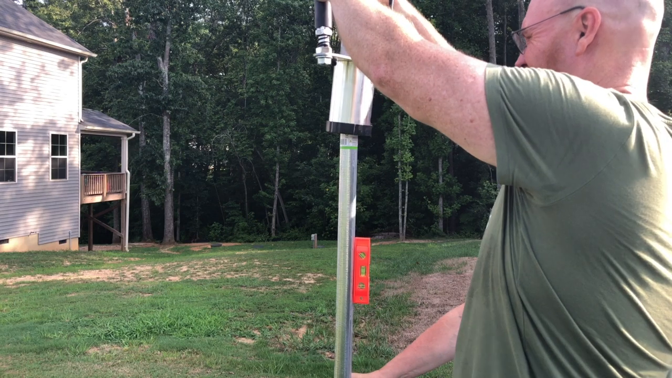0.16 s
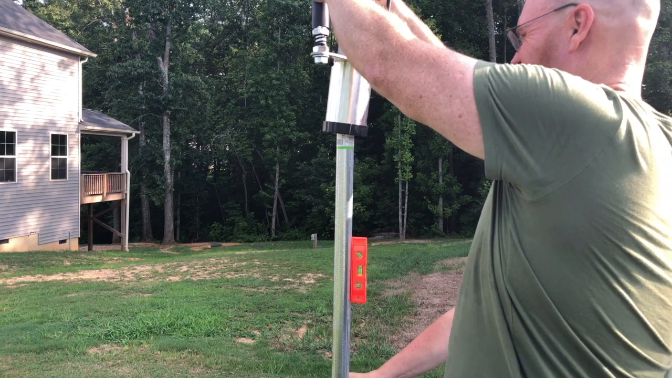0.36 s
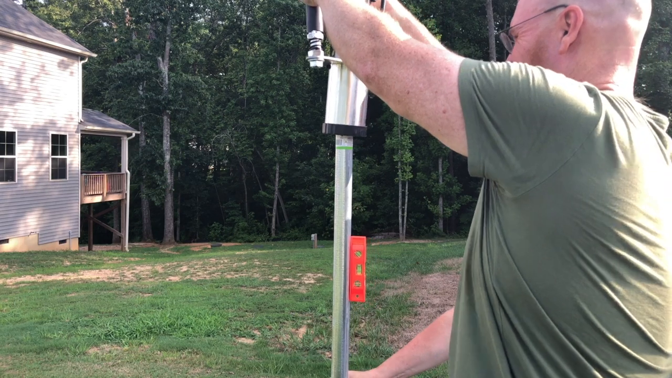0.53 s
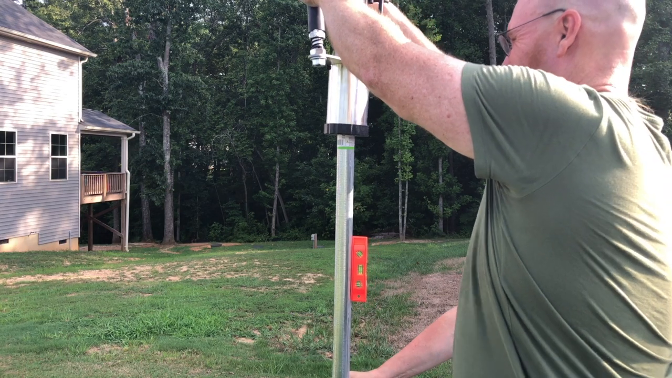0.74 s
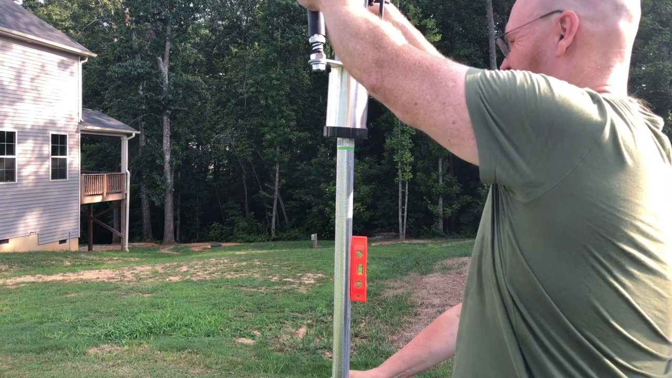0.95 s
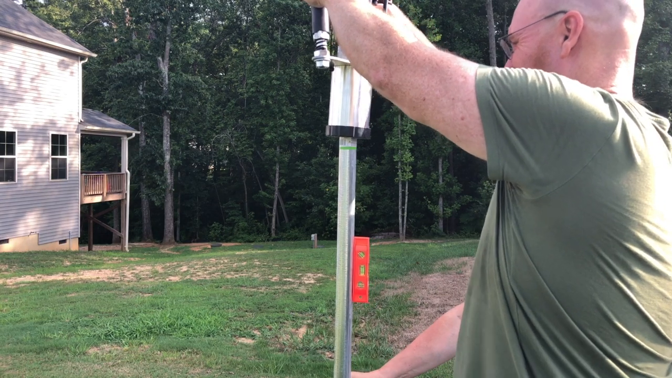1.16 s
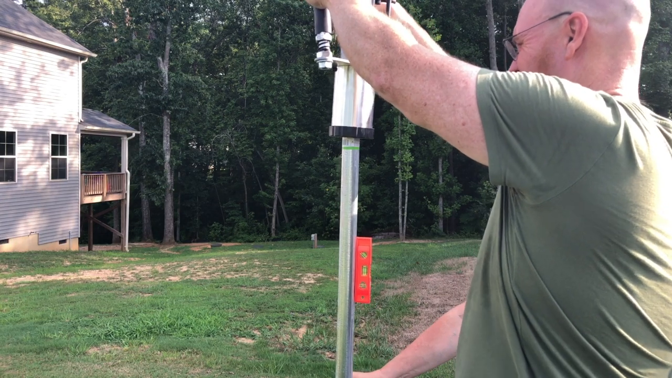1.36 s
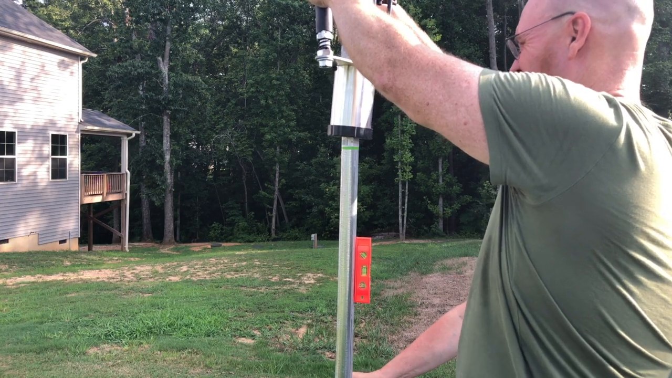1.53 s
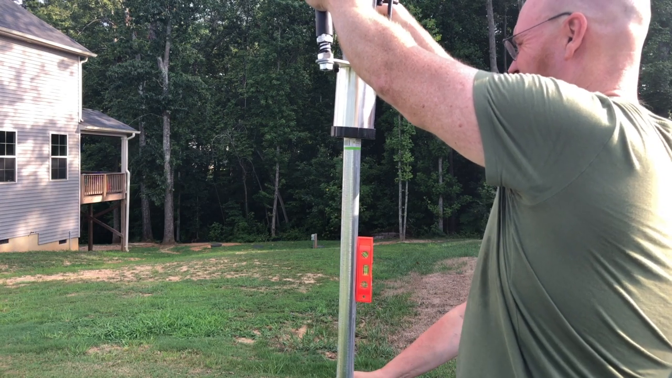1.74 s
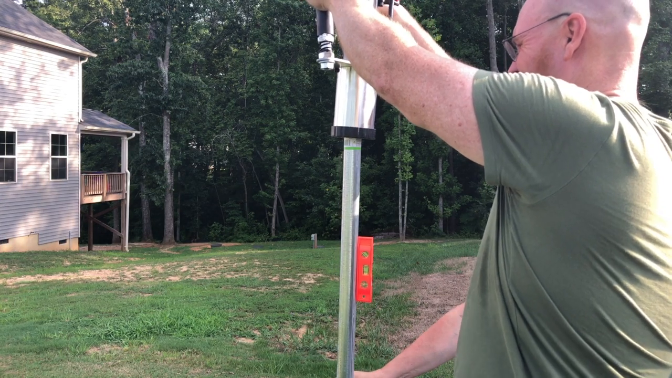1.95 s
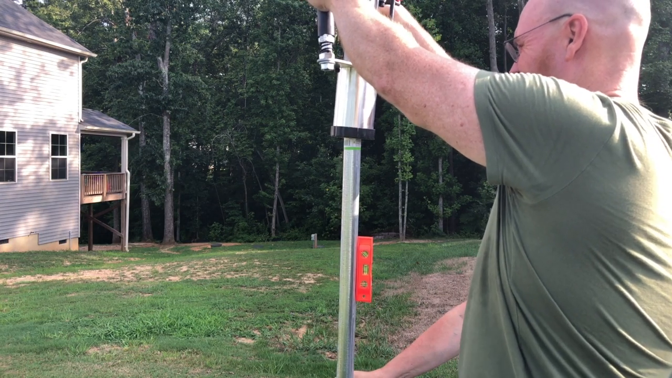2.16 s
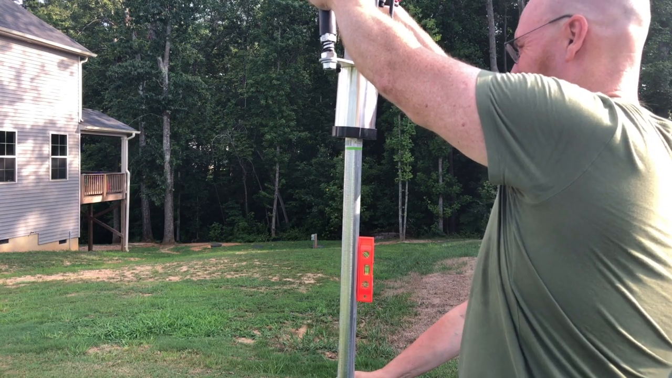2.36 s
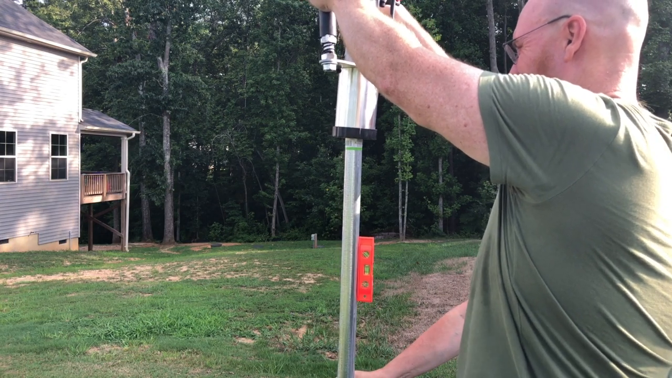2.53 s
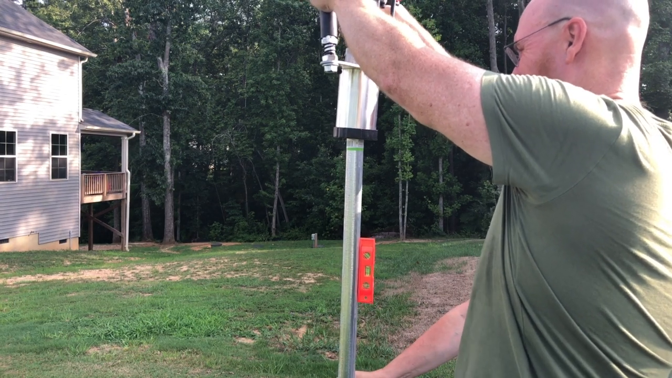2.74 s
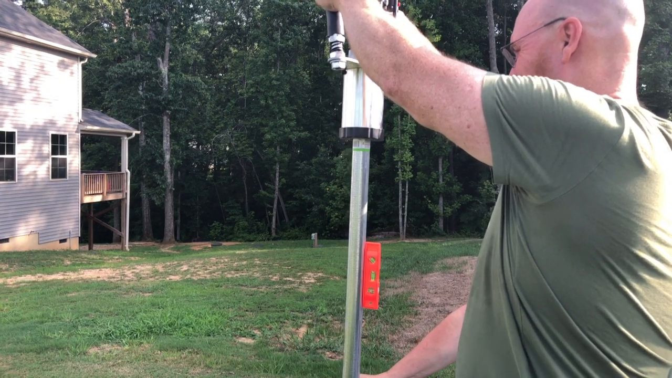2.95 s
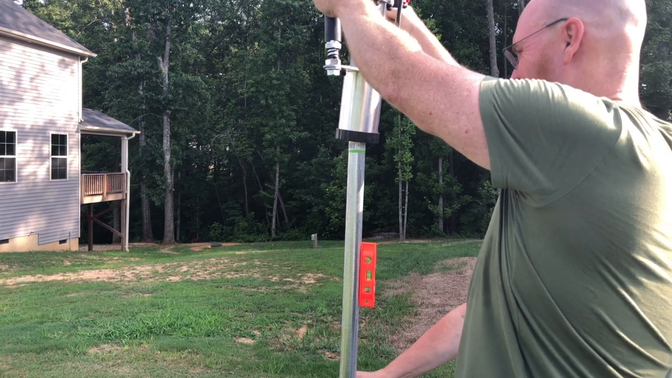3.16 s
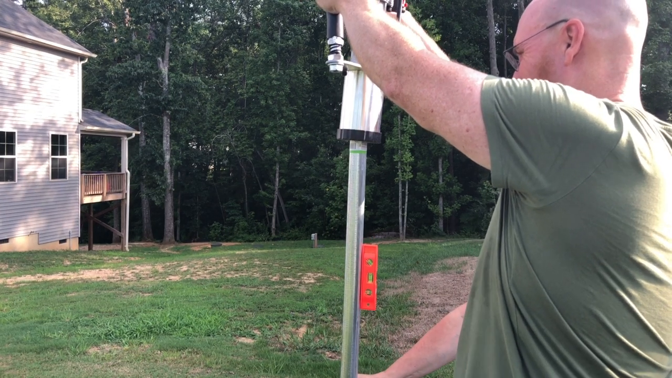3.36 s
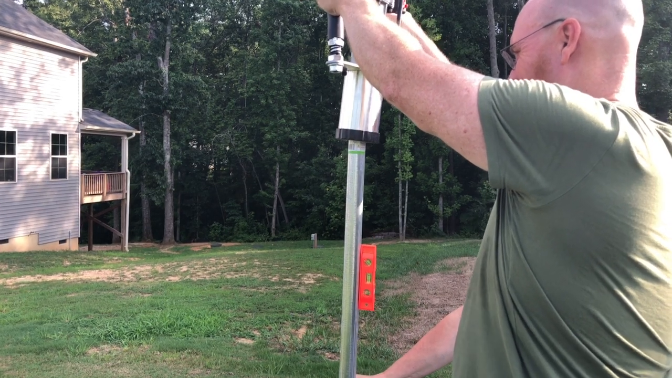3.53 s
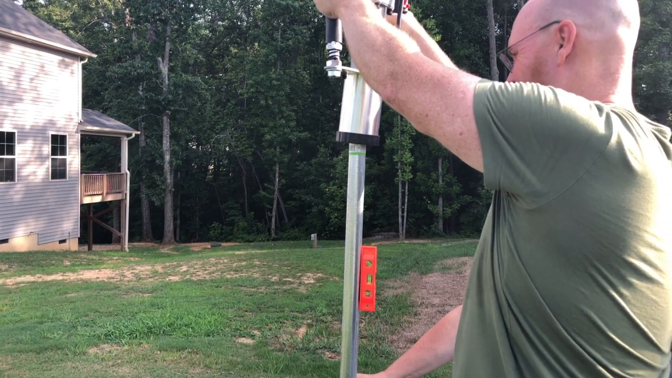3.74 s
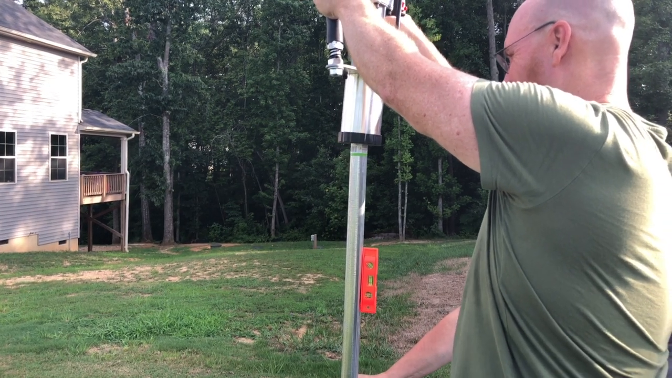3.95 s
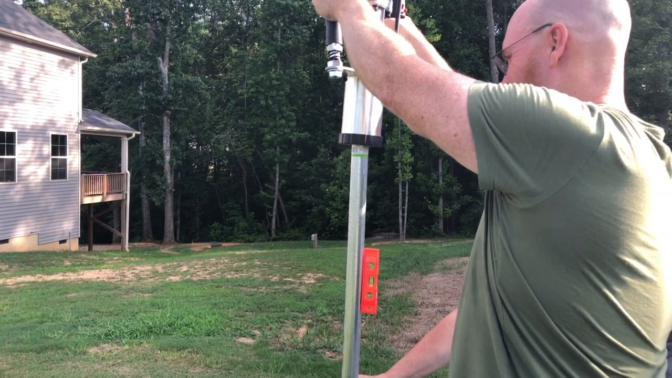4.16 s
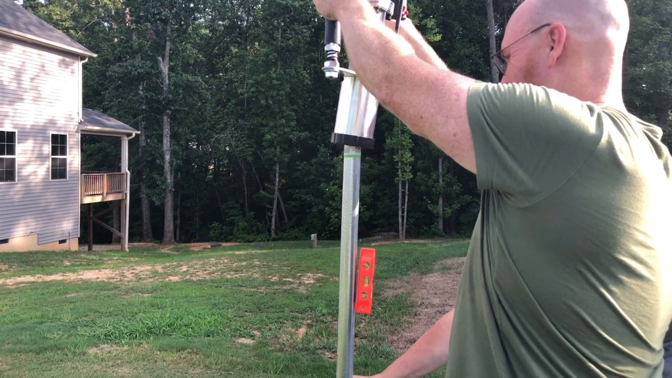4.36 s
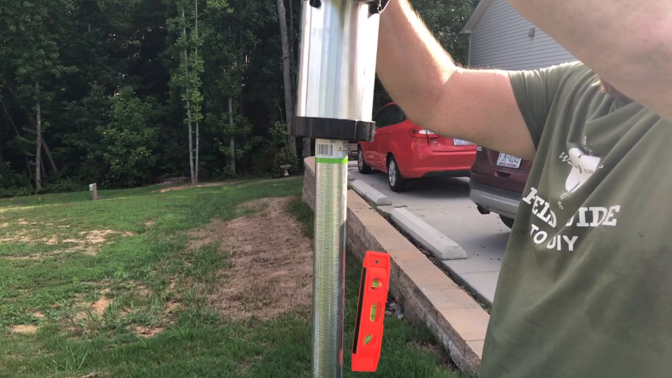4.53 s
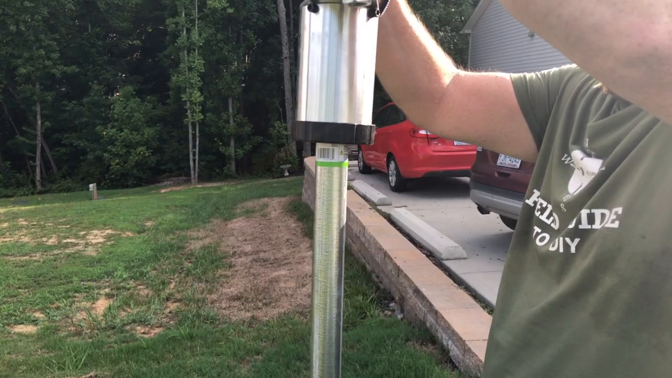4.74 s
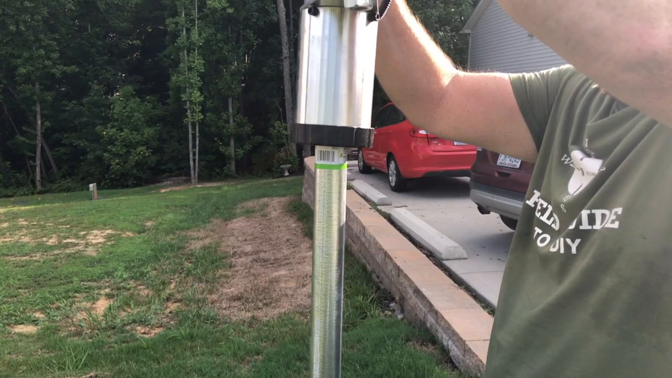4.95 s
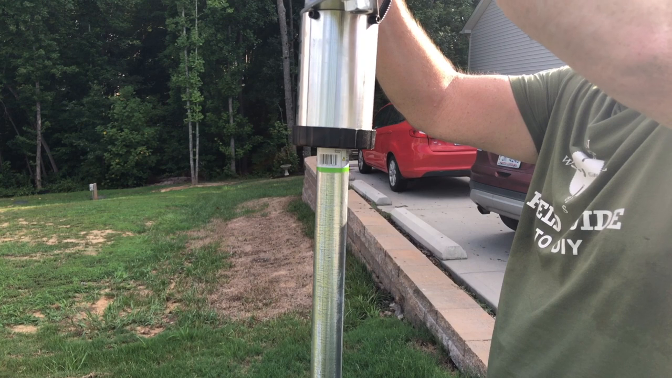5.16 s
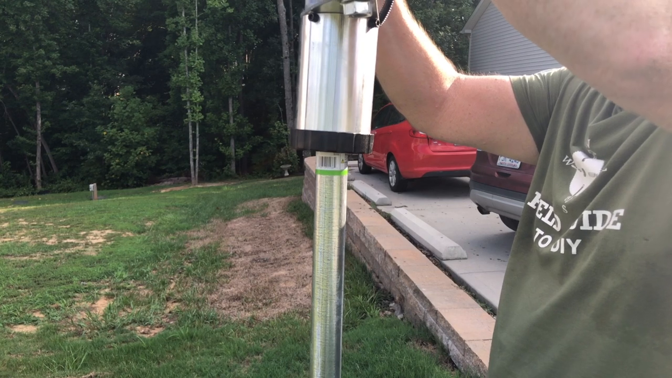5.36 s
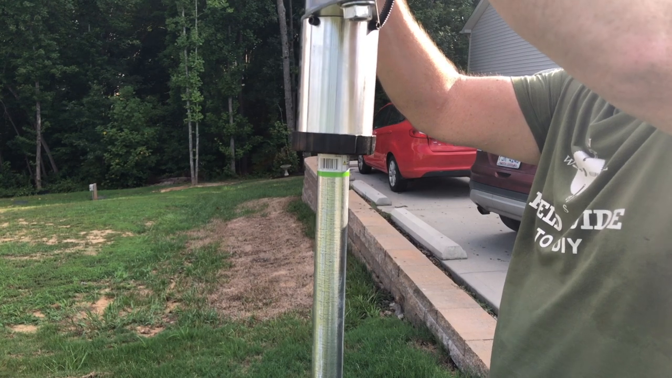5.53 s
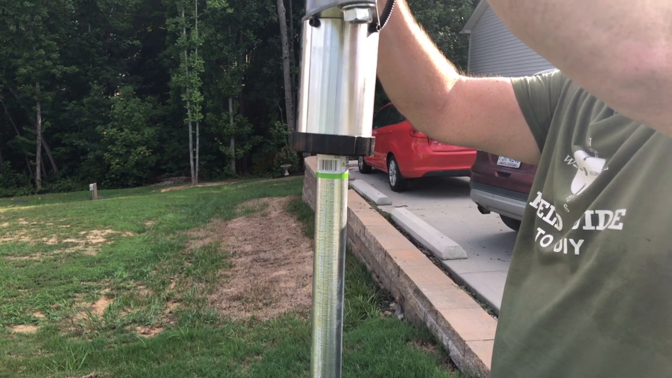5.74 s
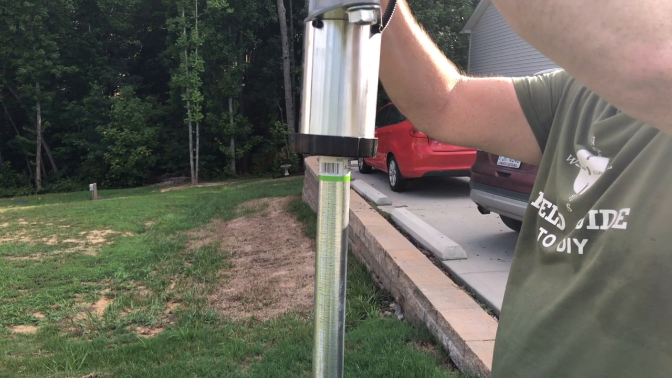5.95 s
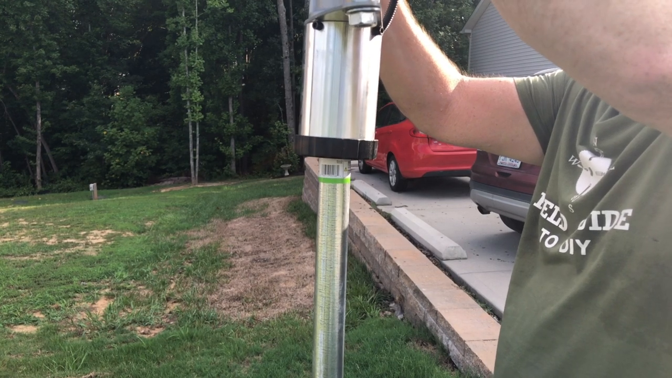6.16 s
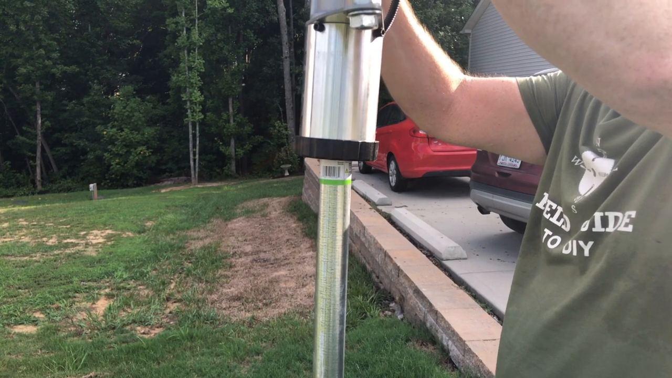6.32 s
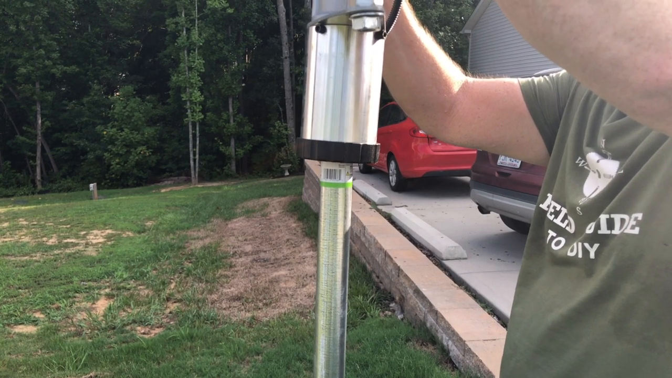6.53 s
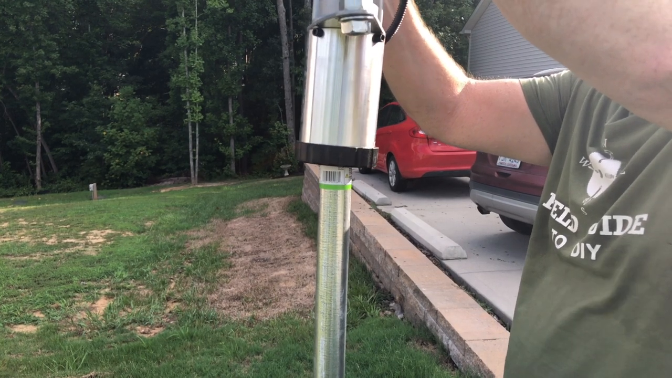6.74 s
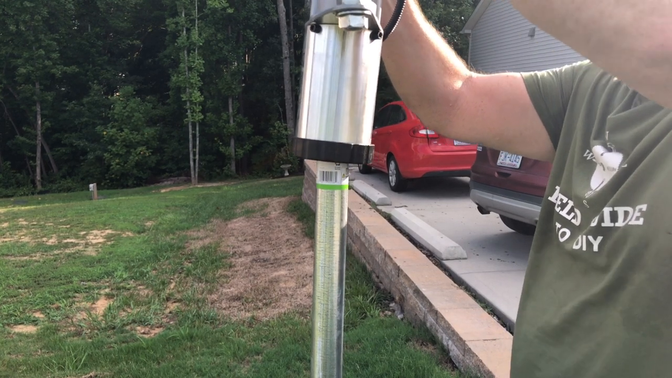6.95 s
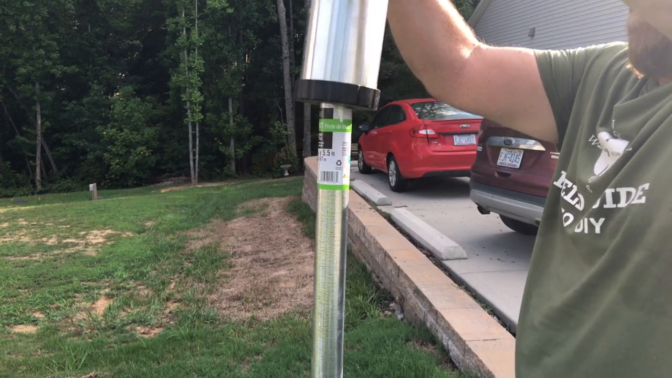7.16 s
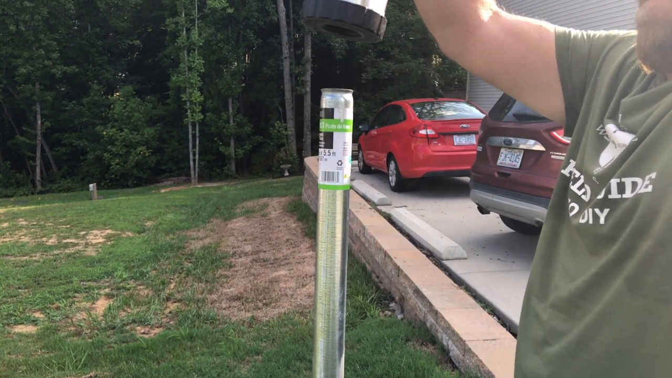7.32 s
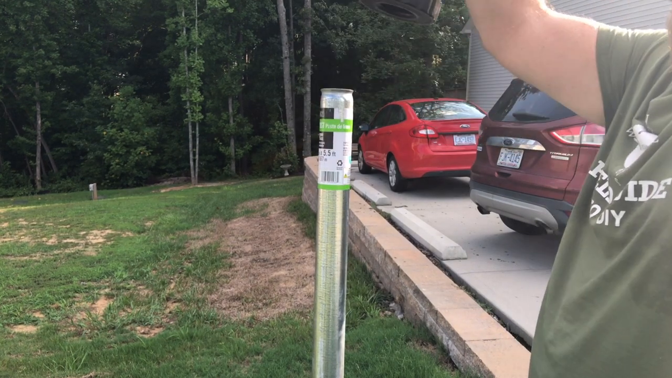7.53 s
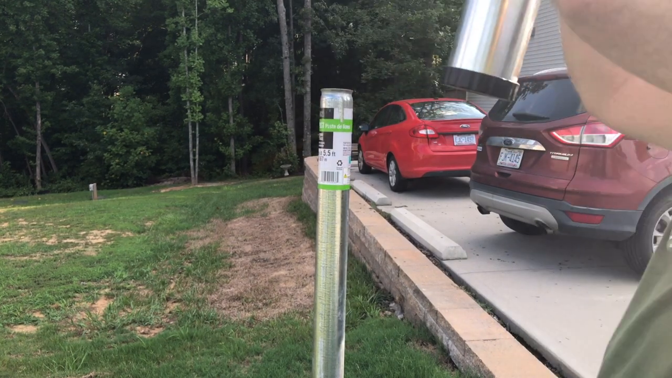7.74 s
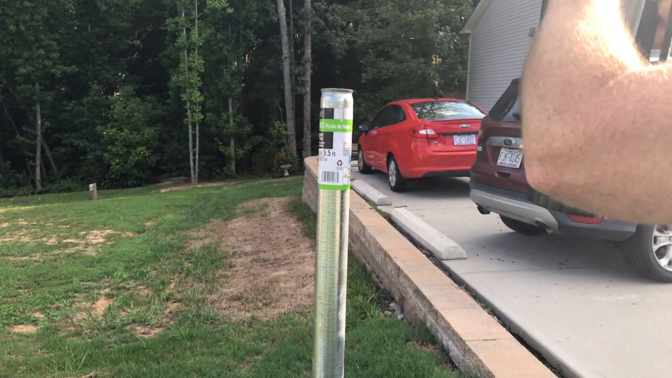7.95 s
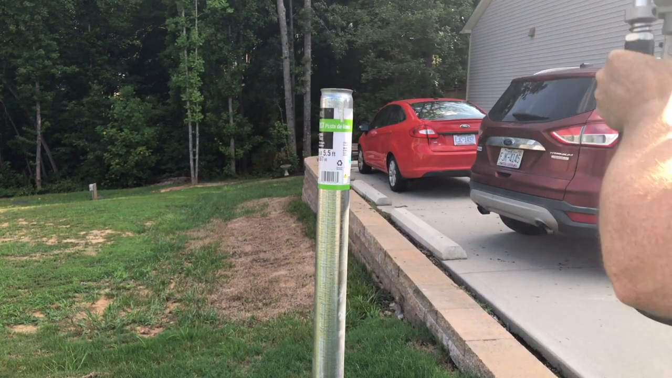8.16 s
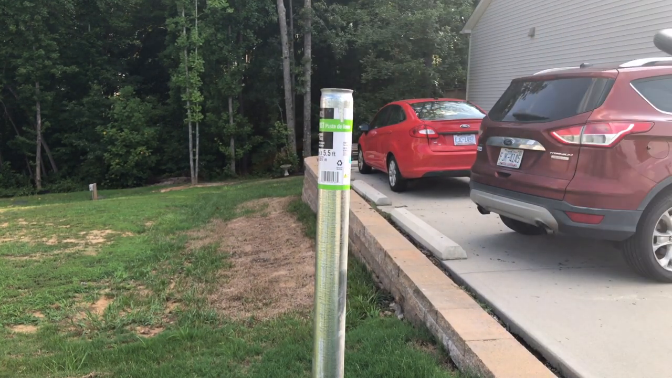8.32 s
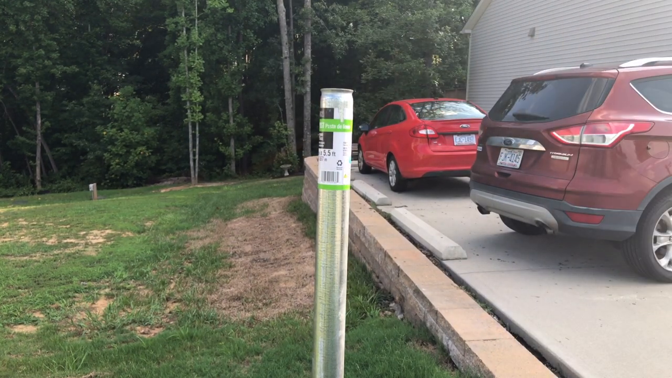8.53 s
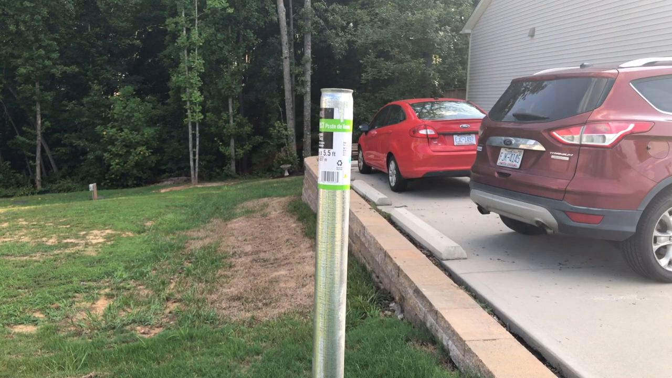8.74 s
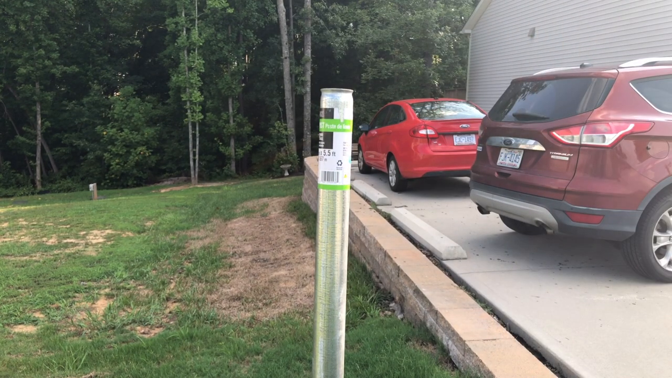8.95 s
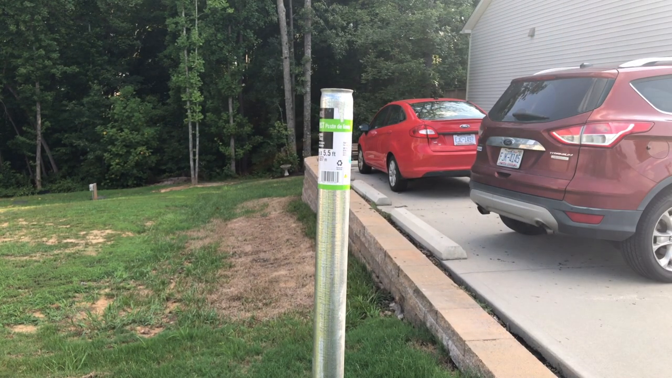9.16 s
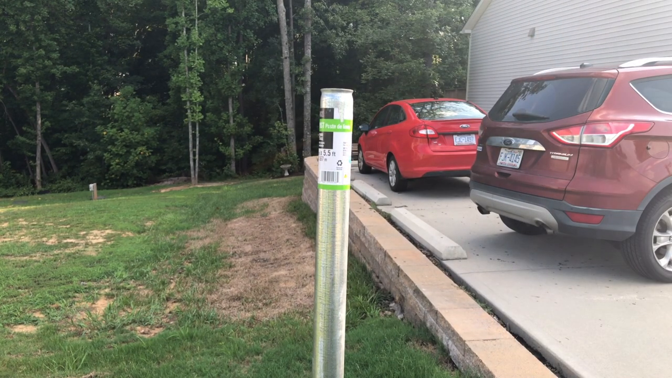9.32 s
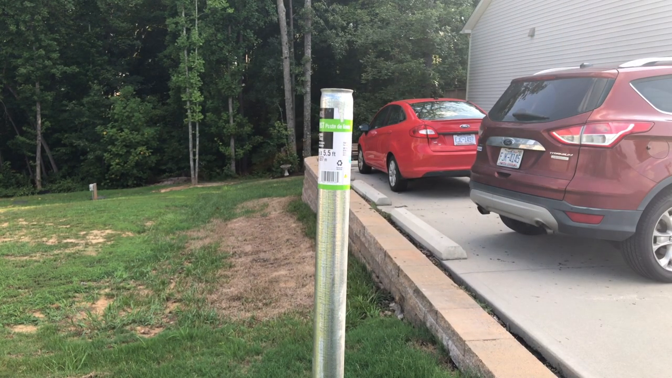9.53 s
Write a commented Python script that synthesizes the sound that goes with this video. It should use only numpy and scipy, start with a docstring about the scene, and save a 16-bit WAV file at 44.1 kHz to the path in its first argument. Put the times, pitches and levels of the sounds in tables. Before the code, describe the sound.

A small petrol post driver idles, revs up and loudly hammers a steel fence post, then drops back to a clattering idle.

```python
"""A small four-stroke petrol post driver idles on a steel fence post in a garden: the exhaust puffs, the
casing clatters, the gears whine. At about 2.5 s it is throttled up, the clutch bites and the hammer rings
the post, then a second post from 4.5 s, overloading the close microphone. Near 7 s it runs down to idle
and the loose sleeve clanks on the singing tube. Around 8 s the driver is carried aside. At 9.15 s the
sound cuts abruptly to a louder, fuller idle and outdoor background, and the engine begins to sink away."""
import sys
import numpy as np
from scipy import signal
from scipy.fft import rfft, irfft, next_fast_len
from scipy.io import wavfile
from scipy.ndimage import uniform_filter1d

SR = 44100
rng = np.random.default_rng(int(sys.argv[2]) if len(sys.argv) > 2 else 0)


def dump_mix(stems):
    """Bounce the given channels to the path in sys.argv[1] as a 16-bit WAV at rate SR."""
    frames = np.atleast_2d(stems).T  # one column per channel
    limited = np.clip(frames, -1, 1)  # hard clip at full scale
    pcm = np.round(limited * 32767).astype(np.int16)
    wavfile.write(sys.argv[1], SR, pcm)


N = 427329
TIME = np.arange(N) / SR
GRID = np.fft.rfftfreq(8192, 1 / SR)  # Hz, where filter gains are drawn
SPLIT_HZ = 2850  # between the body and the bright edge of the metal


# The post's tone with the driver seating, on each post, and loose. Each row: frequency in Hz, level in dB.
SEATING_TONE = [(180, -42.5), (300, -0.5), (418, -12), (524, 1), (781, -18.5), (846, -2), (1520, -11),
                (1670, -3.5), (2390, -25), (3510, -7.5), (7200, -46), (9360, -65.5), (15800, -120)]
FIRST_POST_TONE = [(88, -42.5), (150, -14), (384, -30), (750, -9.5), (1080, -5.5), (1250, -2), (1400, -8),
                   (1650, 7.5), (2100, -6), (2280, -6.5), (2550, -0.5), (2910, -10.5), (3150, -6),
                   (3890, -5), (6530, -9), (7200, -11), (9360, -61), (15800, -120)]
SECOND_POST_TONE = [(88, -48), (150, -30.5), (204, -15), (306, -17.5), (459, -8.5), (699, -4.5),
                    (1250, -12.5), (1850, -3), (2000, -2.5), (2550, -11.5), (3310, -13.5), (4430, -13),
                    (4880, -15), (6020, -12), (7200, -11.5), (9360, -50), (15800, -120)]
LOOSE_TONE = [(240, -54), (400, -23), (816, -16), (1420, -19.5), (1860, 7.5), (2050, -11.5), (2580, -11.5),
              (2700, -21.5), (3240, -36.5), (4130, -13.5), (5390, -28), (6080, -20.5), (7200, -24),
              (9360, -63.5), (15800, -120)]
# The resonances on top of those tones. Each row: frequency in Hz, width in Hz, level in dB.
SEATING_MODES = [(526, 43, -8), (1030, 63, -6.5), (1640, 170, -5)]
FIRST_POST_MODES = [(1275, 92, -11.5), (1604, 170, -4), (2106, 59, 4), (2595, 48, 2.5), (3206, 73, -4),
                    (3830, 41, -4.5), (4060, 27.4, -9.5), (4294, 33, -6), (5040, 81, -9.5), (5400, 40, -24),
                    (6496, 44, -7)]
SECOND_POST_MODES = [(1623, 86, -0.5), (1838, 94, 1.5), (2210, 130, -4), (2304, 66, -4.5), (2572, 155, -2),
                     (3820, 43, -9.5), (4394, 356, -8), (5940, 109, -7.5), (7040, 44, -12)]
LOOSE_MODES = [(1767, 55, -4.5), (1901, 36, -2.5), (2204, 30, -1.5), (2330, 54, -7.5), (2460, 17, -3),
               (6150, 38, -16.5)]
# The crossfade. Each row: time in seconds, contact (0 seating, 1 first post, 2 second post, 3 loose).
CONTACT = [(2.645, 0.5), (2.67, 1), (4.42, 1.5), (4.58, 2), (6.6, 2), (6.98, 3)]
# The mix, one row a contact. Each row: exhaust hum, post ring, hammer clash, housing rattle, all in dB.
CONTACT_MIX = [(-35, -18.5, -30, -26), (-47.5, -22, -21.5, -30), (-38, -21, -22.5, -31.5),
               (-51, -19, -27, -36)]
# The hammer trembles at idle, bites, holds and coasts to rest. Each row: time in seconds, force in dB.
FORCE = [(0.2, -39), (1.4, -23.5), (2.42, -23), (2.53, -7), (2.63, -4), (2.67, -1), (2.86, 1.5), (3.5, 0.2),
         (5.5, -0.38), (6.5, -1.5), (6.98, -0.5), (7.11, -12), (7.26, -16), (7.5, -64)]
# The housing shakes harder in short bursts. Each row: middle in seconds, boost in dB.
SHAKES = [(2.64, 7), (3.0, 0), (3.74, 6), (4.12, 4), (4.34, 4.5), (4.74, 4), (5.12, 6.5), (5.5, 2),
          (5.8, 3), (6.25, 2)]

def hammer(turns, load, blows_per_cycle=.46, blow_s=0.042, chatter_db=-8, clash_growth=1.95, shake_s=0.1):
    """The geared hammer strikes; anvil and sleeve chatter against the tube. Harder blows are brighter."""
    hits = strikes(turns * blows_per_cycle + .05 * wander(15), spread_db=3.2)
    blows = decay(hits, blow_s) + amp(chatter_db)
    blows = (blows / np.mean(blows)) ** load  # the blows soften to a buzz as the clutch lets go
    bounces = (rng.random(N) < 700 / SR) * rng.standard_normal(N)  # about 700 a second
    grit = rng.standard_normal(N) + amp(-2) * unit(bounces)
    drive = flare(blows * grit, depth_db=2.2, bins=5, frames=6)
    force = amp(curve(FORCE))
    shake_db = sum(db * np.exp(-((TIME - s) / shake_s) ** 2) for s, db in SHAKES)
    ring_gain = force * fader(CONTACT, CONTACT_MIX, column=1)
    clash_gain = force ** clash_growth * fader(CONTACT, CONTACT_MIX, column=2)
    housing_gain = np.minimum(force, 1) * fader(CONTACT, CONTACT_MIX, column=3) * amp(shake_db)
    contacts = [(SEATING_TONE, SEATING_MODES), (FIRST_POST_TONE, FIRST_POST_MODES),
                (SECOND_POST_TONE, SECOND_POST_MODES), (LOOSE_TONE, LOOSE_MODES)]
    out = np.zeros(N)
    for k, (tone, modes) in enumerate(contacts):
        metal = ring(drive, body(tone, modes, modes_db=1))
        housing, tube = band(metal, 0, 1400), band(metal, 1400, SPLIT_HZ)
        clash = metal - housing - tube
        mix = housing_gain * unit(housing) + ring_gain * unit(tube) + clash_gain * unit(clash)
        out += share(CONTACT, k) * mix
    return out


# The second post's long-ringing notes. Each row: frequency in Hz, width in Hz, level in dB.
SINGING_MODES = [(1879, 20, -2.5), (1770, 25, -6), (2128, 6.8, -12), (2496, 5.6, -6)]
# Their fader ride. Each row: time in seconds, level in dB.
SINGING_LEVEL = [(4.5, -71), (4.8, -28.5), (5.5, -42), (5.9, -30.5), (7.0, -28), (7.45, -51.5), (7.6, -70)]

def singing(waver_db=2):
    """The tube sings on as the sleeve comes loose, its modes kept going by a noisy rattle."""
    rattle = rng.standard_normal(N)
    modes = 0
    for hz, width, db in SINGING_MODES:
        pole = np.exp((2j * np.pi * hz - np.pi * width) / SR)
        swing = signal.lfilter([1], [1, -pole], signal.lfilter([1], [1, -pole], rattle))
        damped = swing.real / np.sqrt(abs(swing) + 1e-9)  # contact damps the widest swings
        modes = modes + amp(db) * unit(damped)
    return unit(modes) * amp(curve(SINGING_LEVEL)) * amp(waver_db * wander(25))


# The sleeve knocks on the post. Each row: start in seconds, level in dB.
CLANKS = [(2.456, -29), (2.487, -28.5), (2.512, -21), (4.15, -17), (6.904, -20), (7.142, -30), (7.245, -37),
          (7.418, -25)]

def clanks():
    """Single knocks of the loose sleeve ring the post."""
    knocks = taps(CLANKS, decay_s=0.005) * rng.standard_normal(N)
    return ring(knocks, unit(body(LOOSE_TONE, LOOSE_MODES, modes_db=0)))


# The sleeve touches the rim. Each row: start in seconds, level in dB.
PINGS = [(7.012, -27), (7.14, -29.5)]

def rim_pings(hz=5865):
    """Light touches of the sleeve sound one short, high note of the rim."""
    return taps(PINGS, decay_s=0.01) * np.sin(2 * np.pi * hz * TIME)


# Low thuds while the post sinks. Each row: time in seconds, level in dB.
THUDS = [(2.838, -28), (3.488, -19.5), (3.622, -31), (4.21, -24), (4.52, -28), (4.752, -26), (4.898, -25),
         (5.063, -25), (5.32, -30), (5.396, -19.5), (5.47, -24), (5.747, -26), (5.83, -18), (5.914, -24),
         (5.957, -24), (6.16, -24.5), (6.288, -31), (6.37, -26), (6.409, -31), (6.66, -23)]

def thuds(load, dip_s=0.0037, rebound_s=0.0078, rumble_db=-47.5):
    """Each thud is a short dip of pressure and a slower rebound, over a rumble while the hammer works."""
    out = amp(rumble_db) * wander(110) * load ** 4
    for s, db in THUDS:
        dip = 1.16 * np.exp(-((TIME - s) / dip_s) ** 2)
        rebound = 0.37 * np.exp(-((TIME - s - rebound_s) / rebound_s) ** 2)
        out += amp(db) * (rebound - dip)
    return out


def housing_bump(start_s=3.228, db=-20, hz=190, decay_s=.005):
    """One hollow, heavily damped swing of the housing."""
    age = np.maximum(TIME - start_s, 0)
    return amp(db) * np.exp(-age / decay_s) * np.sin(2 * np.pi * hz * age)


# The engine's perspective. Each row: time in seconds, position (0 on the first post, 1 on the second post
# and through the run-down, 2 aside, 3 after the cut).
POSITION = [(4.5, 0), (4.56, 1), (7.9, 1), (8.35, 2), (8.75, 2), (9.145, 2.15), (9.155, 3)]
# The mix, one row a position. Each row: exhaust puffs, crankcase knock, valve ticking, all in dB.
ENGINE_MIX = [(-46, -39.5, -43), (-45.5, -40.5, -44), (-39.5, -35.5, -45), (-30, -30, -36)]
# The tone of one puff of gas. Each row: frequency in Hz, level in dB.
PUFF_TONE = [(30, -33), (70, -14), (130, -1), (230, 2), (330, 1.5), (420, 0), (490, -5.5), (720, -11),
             (1200, -30)]

def exhaust(turns, load, fire_at=-0.024, intake_at=0.258, lope_db=1.5, lope_change_s=4.53, load_db=-1):
    """Each cycle pushes out a puff and sucks in a gulp; the beat lopes in threes, later in twos."""
    accent = np.where(TIME < lope_change_s, np.cos(2 * np.pi * turns / 3), -np.cos(np.pi * turns))
    intake_gain = amp(np.interp(curve(POSITION), [0, 2], [-2, -5]))  # softer once carried aside
    firings = strikes(turns - fire_at, spread_db=1.9) * amp(lope_db * accent)
    gulps = strikes(turns - intake_at, spread_db=1.9) * intake_gain
    one_puff = np.fft.fftshift(irfft(shape(PUFF_TONE)))
    puffs = band(signal.oaconvolve(firings - gulps, one_puff, "same"), 0, 1300)
    puffs /= np.sqrt(curve(SPEED) * (1 + intake_gain ** 2))  # even power at any speed
    puffs /= np.std(band(puffs, 100, 450))
    return puffs * fader(POSITION, ENGINE_MIX, column=0) * amp(load_db * load)


# The exhaust's notes under load. Each row: multiple of the firing rate, level in dB.
HUM_NOTES = [(2, 4), (4, 3), (5, 1.5), (6, -28.5), (7, -3.5), (9, -1)]

def hum(turns, load, swell_db=0.7):
    """At speed the puffs merge into a few notes, shaken by the hammer's kicks."""
    shaken = [(amp(db + 2 * wander(25)), k * turns + .05 * wander(25)) for k, db in HUM_NOTES]
    notes = sum(gain * np.sin(2 * np.pi * (phase + rng.random())) for gain, phase in shaken)
    return unit(notes) * fader(CONTACT, CONTACT_MIX, column=0) * amp(swell_db * wander(4)) * load ** 2


# The cycle's noisy moments. Each row: place in the cycle (0-1), length in cycles, knock in dB, tick in dB.
STROKES = [(.0, 0.074, -2, -4), (.22, 0.049, 2, -3.5), (0.518, 0.092, -1, 2.5), (0.758, 0.076, -0.5, -2.5),
           (.89, 0.077, -12, 1.5)]
# The casing's tone in each position. Each row: frequency in Hz, level in dB.
CASING_FIRST_TONE = [(210, -58), (350, -24), (364, -17.5), (470, -1.5), (611, -2.5), (757, -7.5), (916, -6),
                     (1700, -6.5), (2930, -17.5), (3120, -26.5), (3730, -3), (4740, -19.5), (5120, -26),
                     (5810, -11.5), (7200, -33.5), (9360, -56), (15800, -120)]
CASING_SECOND_TONE = [(210, -23), (400, -7), (520, 3), (780, -11), (950, -6), (1350, -7.5), (1900, -5),
                      (2400, -7.5), (3150, -13), (3600, -8.5), (4400, -13.5), (4900, -22), (5700, -13),
                      (6800, -19), (7300, -45)]
CASING_ASIDE_TONE = [(210, -38), (350, -12), (451, -12), (566, -18.5), (720, -4), (1010, -15), (1110, 1),
                     (1300, -15), (1520, -8), (1660, -15), (1960, -3), (2340, -26), (2680, -22),
                     (4510, -16.5), (7200, -28.5), (9360, -74.5), (15800, -120)]
CASING_AFTER_CUT_TONE = [(210, -9.5), (350, 0), (392, -22), (451, -22), (480, -40.5), (711, 3.5), (817, -6),
                         (1000, -16), (1150, -7), (1600, -12), (2310, -13), (3330, -15.5), (3730, -15),
                         (6670, -24), (7200, -30), (9360, -58), (15800, -120)]
# The resonances on top of those tones. Each row: frequency in Hz, width in Hz, level in dB.
CASING_FIRST_MODES = [(795, 77, -1.5), (1237, 18, 4), (1732, 77, 1.5), (1978, 33, 1.5), (3225, 76, -3),
                      (3623, 18, 0), (5210, 100, -8), (5560, 67, -6.5), (5930, 26, -12), (6180, 120, -10.5)]
CASING_SECOND_MODES = [(766, 63, 4), (1914, 63, -1), (2356, 30, 0), (4060, 280, -10), (4690, 59, -9.5),
                       (5610, 67, -18.5)]
CASING_ASIDE_MODES = [(780, 240, -16), (1097, 26, -1.5), (1451, 76, -4), (1980, 73, 1.5), (2290, 58, -3.5),
                      (3600, 36, -5), (4150, 86, -9)]
CASING_AFTER_CUT_MODES = [(835, 98, 2.5), (1146, 99, 7), (1930, 100, -1), (2290, 84, -11), (3140, 90, -15),
                          (3790, 230, -9.5)]

def clatter(turns, load, steady_db=-8, click_db=-16, load_knock_db=6, load_tick_db=0.5):
    """Piston, valves and gears rattle the casing in step with the cycle; its colour follows position."""
    drives = []
    for column, alike in enumerate((.75, .35)):  # share of knock, then tick power that repeats each cycle
        strokes = [(at, length, amp(levels[column])) for at, length, *levels in STROKES]
        power = sum(gain ** 2 * np.exp(-((turns - at) % 1) / length) for at, length, gain in strokes)
        envelope = np.sqrt(amp(steady_db) ** 2 + power)
        clicks = sum(gain * strikes(turns - at, spread_db=5.4) for at, _, gain in strokes)
        repeating = np.sqrt(alike / 2) * each_cycle(turns + .0015 * wander(40))
        fresh = np.sqrt(1 - alike) * rng.standard_normal(N)
        rattle = unit(envelope * (repeating + fresh)) + amp(click_db) * unit(clicks)
        drives.append(flare(rattle, depth_db=1.6, bins=9, frames=7))
    knock_drive, tick_drive = drives
    knock_gain = fader(POSITION, ENGINE_MIX, column=1) * amp(load_knock_db * load)
    tick_gain = fader(POSITION, ENGINE_MIX, column=2) * amp(load_tick_db * load)
    positions = [(CASING_FIRST_TONE, CASING_FIRST_MODES), (CASING_SECOND_TONE, CASING_SECOND_MODES),
                 (CASING_ASIDE_TONE, CASING_ASIDE_MODES), (CASING_AFTER_CUT_TONE, CASING_AFTER_CUT_MODES)]
    out = np.zeros(N)
    for k, (tone, modes) in enumerate(positions):
        casing = body(tone, modes, modes_db=-1)
        knock = band(ring(knock_drive, casing), 0, SPLIT_HZ)
        knock /= np.std(band(knock, 520, SPLIT_HZ))
        tick = unit(band(ring(tick_drive, casing), SPLIT_HZ, SR))
        out += share(POSITION, k) * (knock_gain * knock + tick_gain * tick)
    return out


# The gears' notes. Each row: multiple of the firing rate, level on the first post in dB, level aside in dB.
WHINE_NOTES = [(28, -25, -12), (29, -5.5, -16), (30, -16, -11), (34, -35, -18), (40, -35, -8),
               (47, -17, -35), (54, -35, -17), (84, -35, -19)]

def gear_whine(turns, load, trim_db=-2, waver_db=2):
    """The gears sing faintly at idle, riding the knock's fader and fading out under load."""
    on_post, aside = share(POSITION, 0), np.clip(curve(POSITION) - 1, 0, 1)
    notes = 0
    for k, on_post_db, aside_db in WHINE_NOTES:
        gain = (on_post * amp(on_post_db) + aside * amp(aside_db)) * amp(waver_db * wander(14))
        notes = notes + gain * np.sin(2 * np.pi * (k * turns + .05 * wander(6.5)))
    return np.sqrt(2) * notes * amp(trim_db) * fader(POSITION, ENGINE_MIX, column=1) * (1 - load) ** 2


# The tone of the outdoor bed. Each row: frequency in Hz, level in dB.
AIR_TONE = [(20, -8), (60, -11), (120, -1), (300, -13.5), (1000, -16.5), (7000, -42)]
# Its fader ride. Each row: time in seconds, level in dB.
AIR_LEVEL = [(2.4, -53), (7.3, -55.5), (8, -52.5), (9.145, -52), (9.155, -43)]

def outdoor_air():
    """A soft, low bed of noise that jumps louder at the cut."""
    return amp(curve(AIR_LEVEL)) * unit(ring(rng.standard_normal(N), shape(AIR_TONE)))


def amp(db):
    """Decibels to gain."""
    return 10 ** (np.asarray(db) / 20)


def unit(x):
    """Scales to rms 1."""
    return x / np.sqrt(np.mean(x ** 2) + 1e-20)


def curve(rows):
    """Rows of time and value as a line through every sample."""
    return np.interp(TIME, *np.transpose(rows))


def share(control, k):
    """The crossfade weight of state k, 0-1."""
    return np.maximum(1 - abs(curve(control) - k), 0)


def fader(control, mix, column):
    """One dB column of a mix table, as a gain that follows the control from row to row."""
    return amp(np.interp(curve(control), np.arange(len(mix)), np.array(mix)[:, column]))


def shape(tone):
    """A short spectrum as gains on the frequency grid."""
    hz, db = np.transpose(tone)
    return amp(np.interp(np.log(GRID + 1), np.log(hz), db))


def body(tone, modes, modes_db):
    """Gains of a metal body: a broad spectrum with resonances standing out of it."""
    power = sum(amp(db) ** 2 / (1 + (2 * (GRID - hz) / width) ** 2) for hz, width, db in modes)
    return np.hypot(unit(shape(tone)), amp(modes_db) * unit(np.sqrt(power)))


def ring(x, gains):
    """Minimum-phase filter with the given gains: each click rings out after it lands."""
    log_gain = np.log(np.maximum(np.r_[gains, gains[-2:0:-1]], 1e-5))
    response = np.fft.ifft(np.exp(np.conj(signal.hilbert(log_gain)))).real
    return signal.oaconvolve(x, response[:len(response) // 2])[:N]


def band(x, lo, hi):
    """The part of x between two frequencies."""
    size = next_fast_len(N)
    hz = np.fft.rfftfreq(size, 1 / SR)
    return irfft(rfft(x, size) * ((hz >= lo) & (hz < hi)), size)[:N]


def wander(hz):
    """Random drift of rms 1, no faster than hz."""
    return unit(band(rng.standard_normal(N), .2, hz))


def strikes(turns, spread_db):
    """One click of uneven strength each time turns passes a whole number."""
    clicks = np.diff(np.floor(turns), prepend=np.floor(turns[0])).clip(0, 1)
    return clicks * amp(spread_db * rng.standard_normal(N).clip(-2, 2))


def decay(x, seconds):
    """Gives each click an exponential tail."""
    return signal.lfilter([1], [1, -np.exp(-1 / (seconds * SR))], x)


def taps(cues, decay_s):
    """An envelope that jumps at each cue and dies away."""
    return sum(amp(db) * (TIME >= s) * np.exp(-abs(TIME - s) / decay_s) for s, db in cues)


def each_cycle(turns, size=2048):
    """A random rattle that comes back the same in every cycle."""
    pattern = unit(irfft(np.exp(2j * np.pi * rng.random(size // 4)), size))
    return np.interp(turns % 1 * size, np.arange(size), pattern)


def flare(x, depth_db, bins, frames):
    """Shifting contact lets now one group of modes flare, now another."""
    spectra = signal.stft(x, nperseg=1024)[2]
    patches = uniform_filter1d(rng.standard_normal(spectra.shape), bins, axis=0)
    patches = uniform_filter1d(patches, frames, axis=1)
    return signal.istft(spectra * amp(depth_db * unit(patches)), nperseg=1024)[1][:N]


# The throttle ride. Each row: time in seconds, engine speed in firings a second.
SPEED = [(0.0, 26.38), (0.41, 25.53), (0.81, 26.6), (1.58, 25.35), (2.4, 26.51), (2.56, 43.37),
         (2.82, 43.6), (3.13, 51.78), (3.61, 45.61), (4.53, 47.59), (4.57, 59.03), (4.73, 59.18),
         (4.93, 51.29), (5.26, 57.16), (5.73, 50.37), (6.8, 49.52), (7.03, 32.83), (7.48, 28.38),
         (8.05, 26.76), (8.85, 28.4), (9.69, 27.73)]
IDLE_RATE, FULL_RATE = 28.9, 40  # firings a second between which the centrifugal clutch takes up the load
CUT_S, JUMP_CYCLES = 9.15, .345  # the sound jumps at an abrupt cut, landing partway through a cycle
SINK_DB_PER_S = 5.5  # the engine's fade after the cut

def scene():
    """Engine and hammer, led by the turning crank, with the post's own noises and the outdoor bed."""
    speed = curve(SPEED)
    turns = np.cumsum(speed) / SR - JUMP_CYCLES * (TIME > CUT_S)  # counts engine cycles
    load = np.clip((speed - IDLE_RATE) / (FULL_RATE - IDLE_RATE), 0, 1)
    air = outdoor_air()
    engine = exhaust(turns, load) + hum(turns, load) + clatter(turns, load) + gear_whine(turns, load)
    engine *= amp(-SINK_DB_PER_S * np.maximum(TIME - CUT_S, 0))
    pounding = hammer(turns, load) + singing() + clanks() + rim_pings() + thuds(load) + housing_bump()
    return (pounding + engine + air)[None]


def low_pass(x, hz, size):
    """Steep low-pass."""
    return signal.oaconvolve(x, signal.firwin(size, hz, window=("kaiser", 8), fs=SR)[None], "same")


def record(dry, ceiling=0.16, peak=0.18):
    """The microphone saturates, the treble is cut, and what still overshoots is shaved off."""
    squashed = dry / (1 + (dry / ceiling) ** 4) ** (1 / 4)
    dulled = low_pass(squashed, hz=7230, size=401)
    shaved = dulled / (1 + (dulled / peak) ** 20) ** (1 / 20)
    return low_pass(shaved, hz=15830, size=511)


dry = scene()
out = record(dry)
dump_mix(out)
```